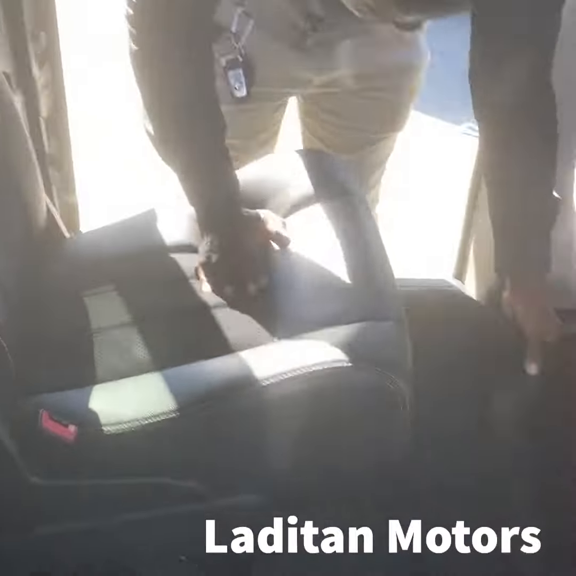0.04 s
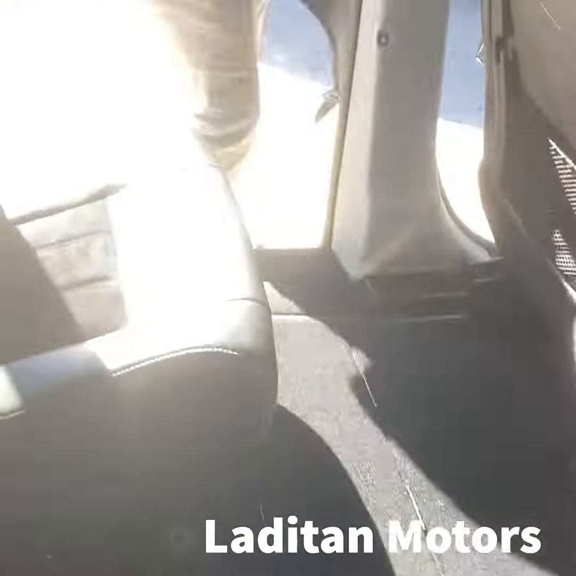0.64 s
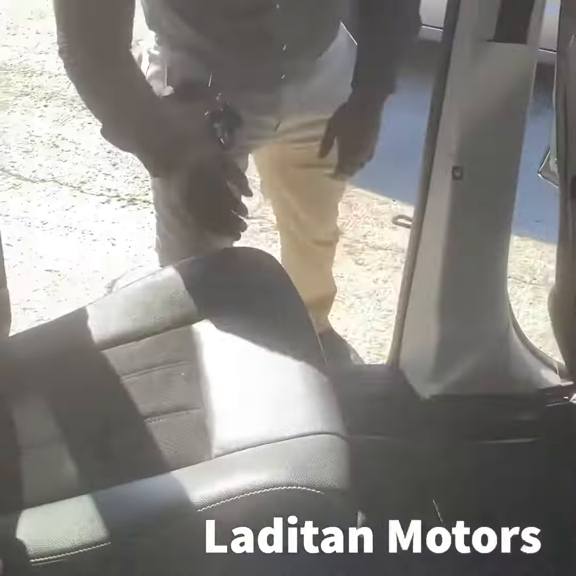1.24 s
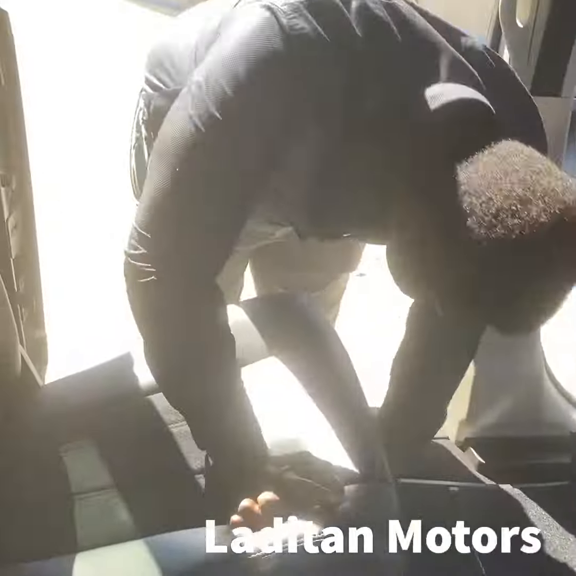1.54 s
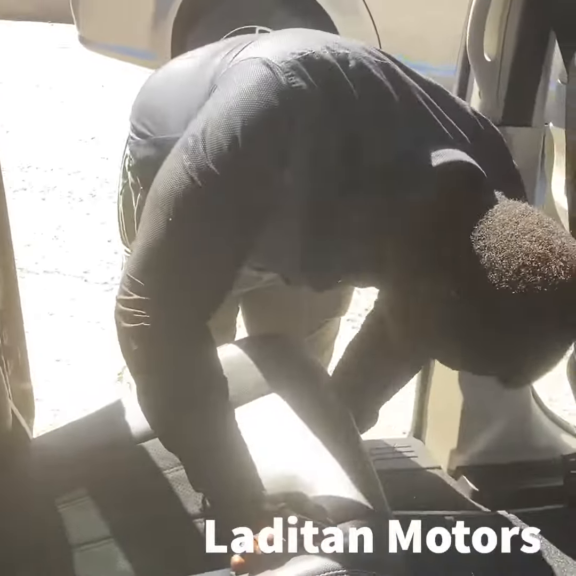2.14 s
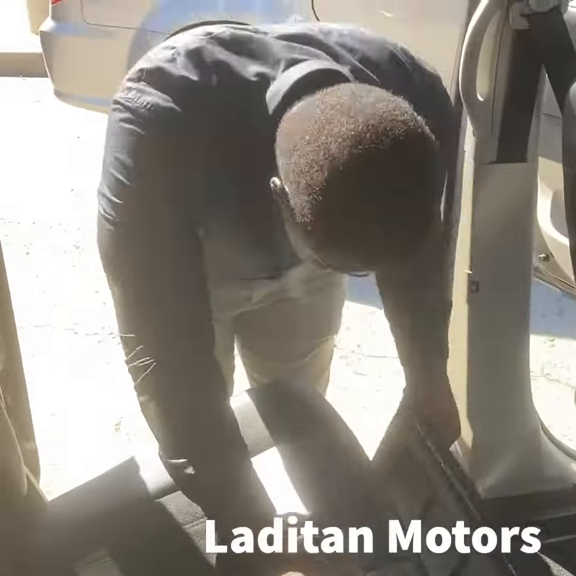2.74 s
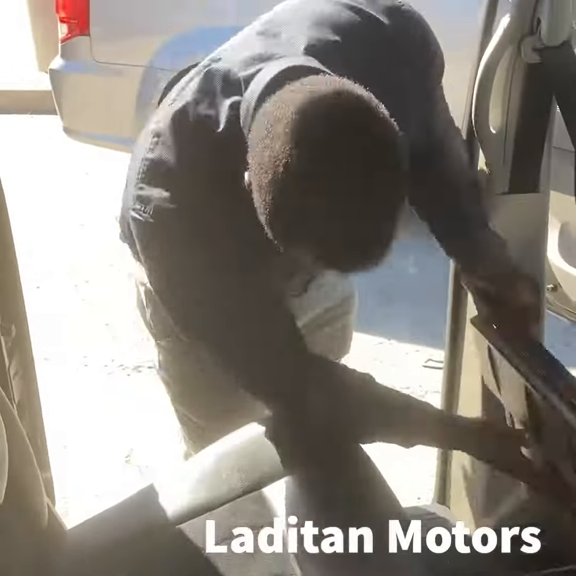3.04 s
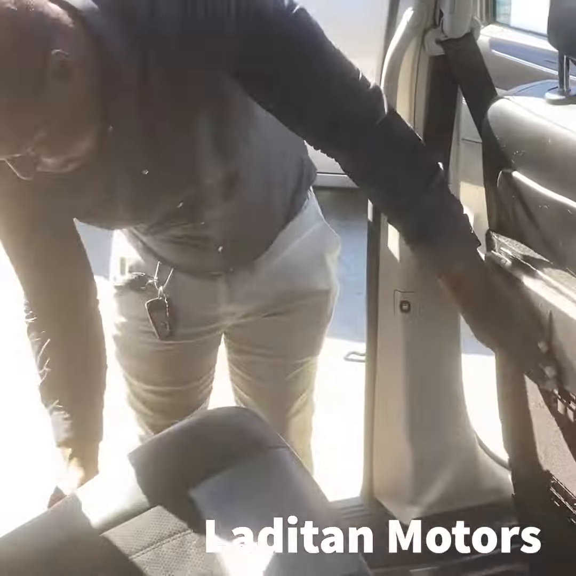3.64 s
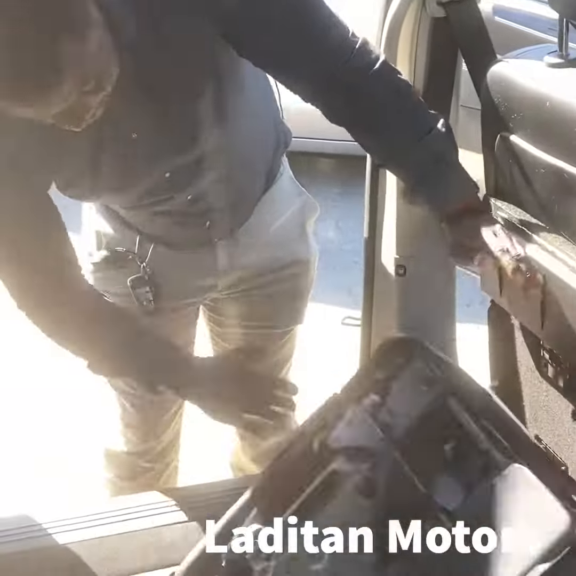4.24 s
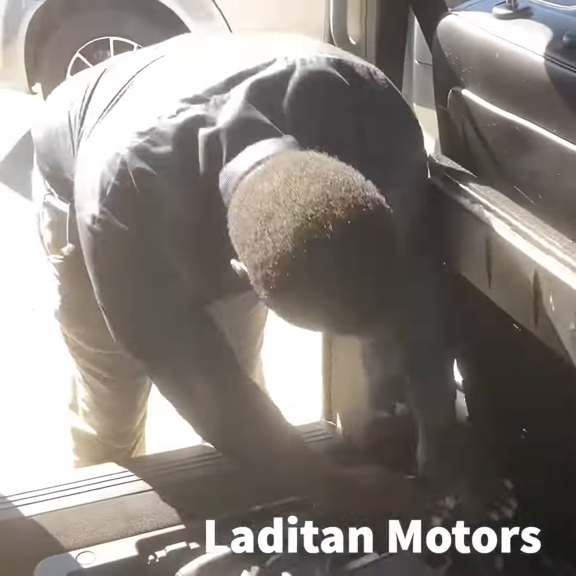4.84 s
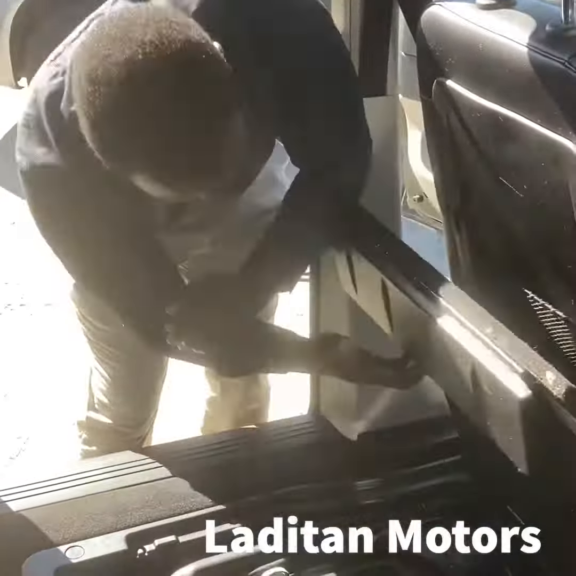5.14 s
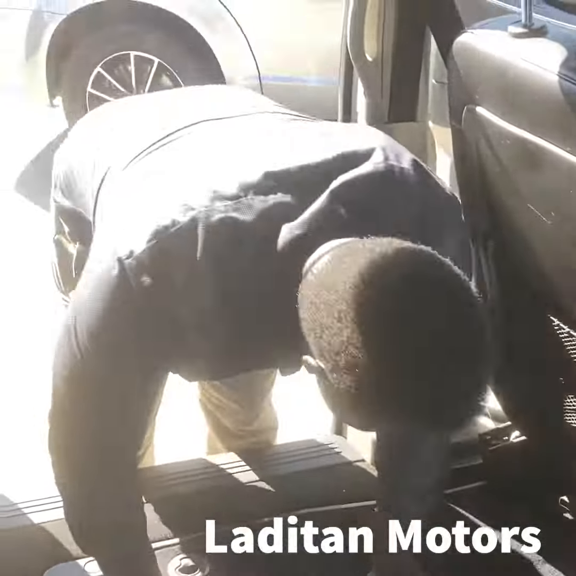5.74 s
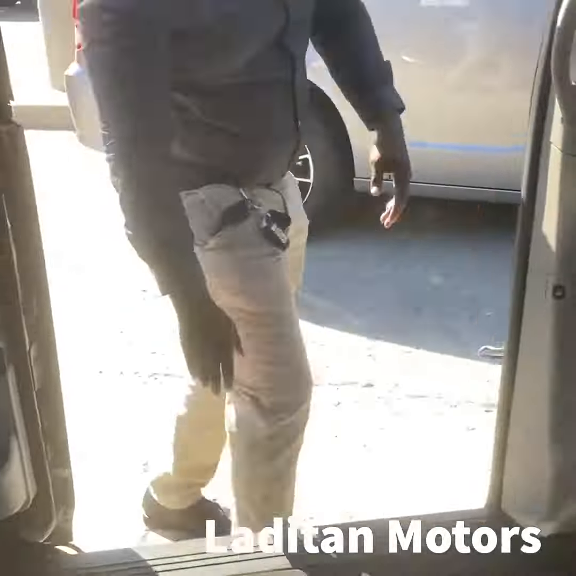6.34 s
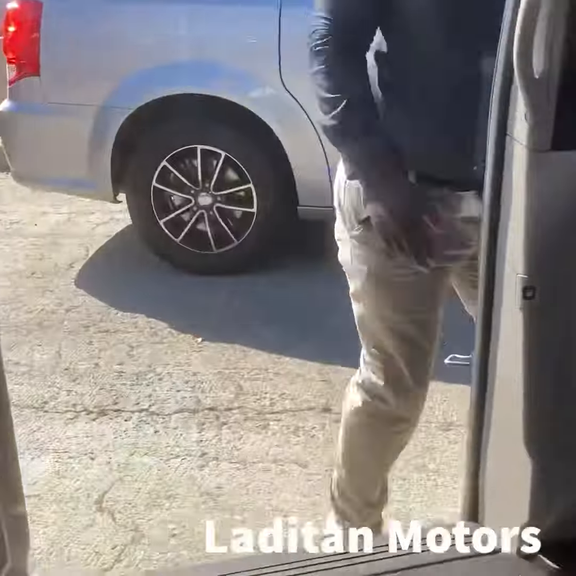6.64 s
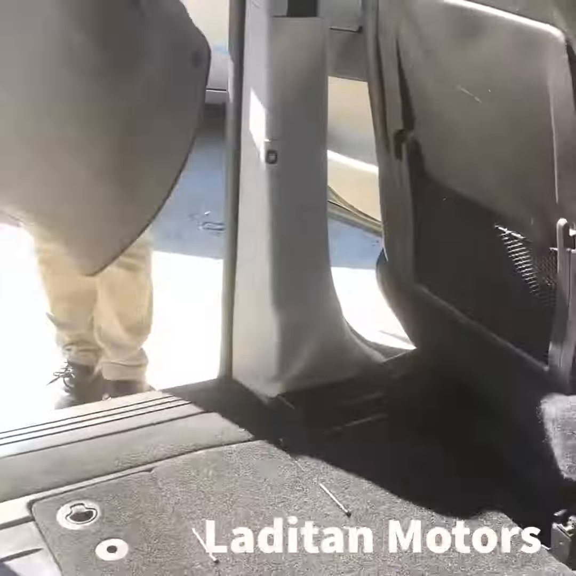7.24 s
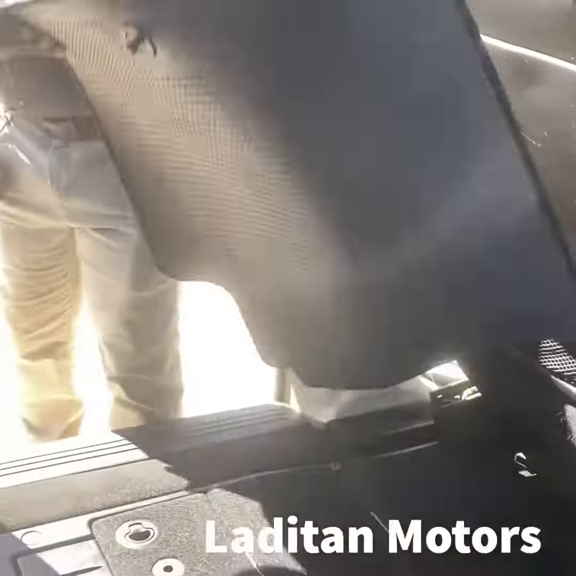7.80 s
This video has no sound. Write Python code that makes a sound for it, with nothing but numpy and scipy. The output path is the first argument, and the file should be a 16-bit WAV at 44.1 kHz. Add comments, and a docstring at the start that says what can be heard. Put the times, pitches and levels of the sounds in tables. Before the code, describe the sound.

Soft rustling and rubbing of sleeves and upholstery lead into a cluster of sharp latch snaps and hollow knocks as a van seat is folded away. It thuds and rattles into the floor, then the lid claps shut and only small clicks and cloth sounds remain. The handling is close and dry in the padded cabin, over idling engines and a faint wash of distant traffic.

```python
"""Inside a van with the side door open: a seat is folded into the floor and the lid above it is shut.
Near the microphone, latches snap, plastic trim clacks and the hollow floor panel thuds as parts meet.
Sleeves and upholstery rustle and rub, their fibres catching and slipping.
Further off, engines hum and boom in the cabin under a faint wash of traffic.
Everything reaches the microphone's two ports only partly alike."""
import sys
import numpy as np
from scipy import signal
from scipy.fft import rfft, irfft, next_fast_len
from scipy.io import wavfile
from scipy.ndimage import uniform_filter1d

SR = 44100
rng = np.random.default_rng(int(sys.argv[2]) if len(sys.argv) > 2 else 0)


def transcribe(u):
    """Save the signal u as a 16-bit wav file named by the first command-line argument.

    u: samples, shape (n,) or (channels, n), limited to [-1, 1]; the rate is SR.
    q: integer samples, one column per channel.
    """
    v = np.clip(np.atleast_2d(u).T, -1, 1)
    q = np.round(v * 32767).astype(np.int16)
    wavfile.write(sys.argv[1], SR, q)


N = 347067
TIME = np.arange(N) / SR

# Far traffic and its boom in the cabin. Each row: time in seconds, relative level in dB.
TRAFFIC_LEVEL = [(1.27, -56.5), (2.12, -54.5), (3.6, -59.5), (3.88, -52.5), (4.82, -52.5), (5.02, -57),
                 (6.95, -53.5), (7.6, -59.5)]
BOOM_LEVEL = [(.65, -40), (1.75, -44), (2.15, -37.5), (3.5, -42.5), (4.4, -35.5), (5.1, -41.5), (6.9, -43),
              (7.87, -38)]
# An engine drops from a fast idle to a slow one. Each row: time in seconds, pitch in Hz.
IDLE_PITCH = [(0, 73.34), (4.25, 79), (4.6, 63.65), (7.87, 61.33)]
# The colour of each source. Each row: frequency in Hz, gain in dB.
TRAFFIC_COLOUR = [(170, 5.5), (350, -0.5), (620, 3), (900, -5.5), (1400, -17.5), (2500, -17.5),
                  (4000, -34.5), (15000, -48)]
RUMBLE_COLOUR = [(15, -17.5), (30, -5), (48, -3), (110, -7.5), (160, -15.5), (1000, -75)]
CLOTH_COLOUR = [(400, -18), (1200, 0), (3800, 2), (9000, 3), (14500, 1.5), (15600, -8.5), (16200, -27)]
PLASTIC_COLOUR = [(560, -22), (1000, 1.5), (2000, 5), (3100, -1), (4500, -16.5), (8000, -53.5)]
TICK_COLOUR = [(1200, -28), (2900, 2.5), (4500, 6), (8000, 2.5), (12500, 1.5), (15000, -4.5), (16500, -24)]
# Modes of the floor panel and its hollow. Each row: pitch in Hz, relative level in dB, t60 in seconds.
PANEL_MODES = [(111.5, -6, 0.086), (132, -5, 0.096), (168.6, 1, 0.066), (203.3, 3, 0.05), (255, -5, 0.052)]
HOLLOW_MODES = [(293, -4, 0.041), (338, -7, 0.08), (405.6, 0, 0.031), (489.6, 1, 0.026), (622, 2.5, 0.028),
                (735, -6, .035)]
# Strokes of sleeves, trousers and carpet; the short stroke at 2.644 s is the latch mechanism sliding as the lid
# shuts. Each row: start in seconds, length in seconds, level in dB.
CLOTH_STROKES = [(0.031, 0.68, -55), (0.833, 0.28, -57), (1.351, 0.2, -49), (2.644, 0.067, -49),
                 (2.807, 0.15, -45), (2.954, 0.27, -54.5), (3.549, 0.15, -62.5), (3.991, 0.52, -53),
                 (4.481, 0.25, -55), (4.667, 0.24, -48), (4.863, 0.21, -52.5), (5.05, 0.17, -52),
                 (5.169, .17, -50.5), (5.4, 0.08, -51), (5.477, 0.052, -37.5), (6.005, 0.067, -51),
                 (6.42, .12, -59), (6.854, 0.22, -52), (7.25, 0.3, -54)]
# Loose trim and buckles click. Each row: start in seconds, level in dB, pitch in Hz.
TRIM_CLICKS = [(1.714, -57, 2400), (2.44, -42, 3040), (2.895, -44, 3380), (2.95, -43, 7150),
               (3.624, -55, 4200), (3.799, -45, 3100), (3.94, -24, 9400), (4.112, -43.5, 3670),
               (4.281, -36, 6450), (4.494, -51.5, 2340), (4.859, -33.5, 13500), (4.965, -49, 7900),
               (5.183, -41.5, 2760), (5.222, -42, 4400), (5.479, -40, 7440), (5.568, -43.5, 2330),
               (6.486, -52.5, 9000), (6.981, -50.5, 3200), (7.103, -54.5, 2400), (7.609, -56.5, 2420)]
# Seat and panels slide on trim. Each row: start and length in seconds, level in dB, centre in Hz.
TRIM_RUBS = [(0.237, 0.049, -52, 1660), (0.474, 0.059, -55, 1680), (1.759, 0.85, -64.5, 2420),
             (1.88, 0.74, -52, 686), (2.911, .15, -40.5, 2050), (2.912, 0.17, -43.5, 790),
             (3.28, .12, -60.5, 2300), (4.275, 0.16, -47, 2300), (4.277, 0.15, -53.5, 895),
             (4.685, 0.58, -57.5, 1720), (4.801, 0.24, -37.5, 189), (6.872, .42, -63, 1810)]
# Latches catch and the lid claps shut. Each row: start in seconds, clack level in dB, clack pitch in Hz,
# tick level in dB, hollow knock level in dB, knock pitch in Hz, panel thud level in dB.
LATCH_BLOWS = [(0.354, -41.5, 2620, -61, -42, 537, -42), (2.6423, -25, 2900, -25.5, -39.5, 400, -40),
               (2.694, -16, 1660, -28.5, -28, 334, -30), (3.132, -28.5, 2010, -28, -42, 781, -50),
               (3.197, -36.5, 1110, -34.5, -29, 572, -36), (3.2096, -17, 1203, -32, -23, 568, -30.5),
               (3.27, -18, 1230, -27, -17, 610, -43), (5.5165, -27.5, 2720, -21, -27, 324.4, -24.5),
               (5.6129, -22, 1173, -23.5, -24.5, 480, -26)]
# The padded seat meets the floor. Each row: start in seconds, thud level in dB,
# hollow knock level in dB, knock pitch in Hz, rattle level in dB.
SEAT_BUMPS = [(0.439, -43, -44.5, 304, -66), (.939, -39, -42, 423, -58.5), (.988, -34, -33.5, 310, -61),
              (2.814, -37, -33.5, 610, -46), (3.849, -20.5, -25.5, 403, -32.5),
              (3.922, -21.5, -33, 475, -21.5), (3.953, -23.5, -31, 530, -31.5),
              (4.187, -26, -39.5, 650, -25), (4.855, -30, -46, 620, -28.5),
              (4.926, -27.5, -38.5, 480, -38.5), (7.272, -43, -41, 577, -75)]
# Hollow trim is tapped or scuffed. Each row: start in seconds, level in dB, pitch in Hz.
TRIM_TAPS = [(4.525, -47.5, 1700), (4.562, -44.5, 1390), (4.863, -36, 1150), (4.996, -40.5, 1280),
             (6.962, -52.5, 1400), (7.047, -58, 2300), (7.162, -55.5, 1310), (7.416, -50, 1760)]
# Phase between the microphone ports. Each row: frequency in Hz, lead of the left in radians.
MIC_PHASE = [(270, 0), (650, -1.9), (900, -2.2), (1200, -.9), (2000, -1.6), (3800, -4.6), (5500, -3.1),
             (7800, 0), (9100, 0), (11700, 3.1), (13900, 6.28)]
# How alike the ports sound. Each row: frequency in Hz, likeness from 0 to 1.
MIC_LIKENESS = [(200, 0.92), (700, 0.63), (3500, 0.23), (5500, 1)]
# Balance of the ports. Each row: frequency in Hz, left minus right in dB.
MIC_BALANCE = [(70, -3.5), (450, -3.5), (1100, -0.5), (1900, -0.14)]


def amp(db):
    return 10 ** (np.asarray(db) / 20)


def unit_rms(x):
    return x / np.sqrt(np.mean(x ** 2) + 1e-20)


def at_level(x, db, span_s=0.02):
    """Scales a blow to the rms level it would have with all its energy in span_s."""
    return amp(db) * x / np.sqrt((x ** 2).mean(0).sum() / (span_s * SR) + 1e-20)


def over_frequency(points, hz):
    knots_hz, values = np.transpose(points)
    return np.interp(np.log(hz + 1), np.log(knots_hz), values)


def over_time(points):
    return np.interp(TIME, *np.transpose(points))


def add(mix, start, sound):
    part = mix[:, max(0, round(start * SR)):][:, :sound.shape[1]]
    part += sound[:, :part.shape[1]]


def colour(x, points, size=8192):
    """Causal filter with the given spectrum."""
    log_gain = np.log(amp(over_frequency(points, abs(np.fft.fftfreq(size, 1 / SR)))))
    taps = np.fft.ifft(np.exp(np.conj(signal.hilbert(log_gain)))).real[:size // 2]
    return signal.oaconvolve(x, taps[None], axes=1)[:, :x.shape[1]]


def resonate(x, hz, width_hz):
    """A resonance of gain 1 whose pitch may follow a curve."""
    turn = np.exp(2j * np.pi * np.cumsum(hz * np.ones(x.shape[1])) / SR)
    pole = np.exp(-np.pi * width_hz / SR)
    return 2 * (turn * signal.lfilter([1 - pole], [1, -pole], x / turn + 1e-18)).real


def drift(size, per_s):
    """Glides between random values of unit spread."""
    knots = rng.standard_normal(int(size / SR * per_s) + 2)
    return np.interp(np.arange(size) / SR * per_s, np.arange(len(knots)), knots)


def at_mic(x):
    """Two unrelated signals become the partly alike sound at the two microphone ports."""
    size = next_fast_len(x.shape[1])
    hz = np.fft.rfftfreq(size, 1 / SR)
    left, unrelated = rfft(x, size)
    likeness = np.clip(over_frequency(MIC_LIKENESS, hz), 0, 1)
    lag = np.exp(-1j * over_frequency(MIC_PHASE, hz))
    right = (likeness * left + np.sqrt(1 - likeness ** 2) * unrelated) * lag
    return irfft(np.array([left, right]), size)[:, :x.shape[1]]


def traffic(wash_db=7, boom_db=-5, hum_db=-5, rumble_db=-4, boom_width_hz=26, swell_db=3):
    """A wash of far traffic; its engines hum, rumble and boom in a narrow cabin resonance."""
    far, low, air = (at_mic(noise) for noise in rng.standard_normal((3, 2, N)))
    wash_gain = amp(over_time(TRAFFIC_LEVEL) + wash_db + swell_db * drift(N, 12))
    wash = wash_gain * unit_rms(colour(far, TRAFFIC_COLOUR))
    idle_hz = over_time(IDLE_PITCH)
    boom = resonate(resonate(air, idle_hz, boom_width_hz), idle_hz, boom_width_hz)
    hum = np.sin(2 * np.pi * np.cumsum(idle_hz + 2 * drift(N, 8.2)) / SR)
    rumble = colour(low, RUMBLE_COLOUR)
    engines = amp(boom_db) * unit_rms(boom) + amp(hum_db) * unit_rms(hum)
    engines = engines + amp(rumble_db) * unit_rms(rumble)
    return wash + amp(over_time(BOOM_LEVEL)) * engines


def fibres(size, catches_per_s=150, crackle_s=0.0005):
    """Cloth drags unevenly, fibres catch in clumps, creases crackle; each fold has its own colour."""
    drag = amp(2.4 * drift(size, 30) + 2.2 * drift(size, 140) + 2.2 * drift(size, 1200))
    catches = (rng.random(size) < catches_per_s / SR) * np.minimum(rng.exponential(1.9, size), 6)
    crackle = signal.lfilter([1], [1, -np.exp(-1 / (crackle_s * SR))], catches)
    friction = rng.standard_normal((2, size)) * (drag + crackle)
    spectra = signal.stft(friction, nperseg=256)[2]
    folds = uniform_filter1d(rng.standard_normal(spectra.shape[1:]), 7, axis=0)
    folds = uniform_filter1d(folds, 4, axis=1)
    cloth = signal.istft(spectra * amp(3.5 * unit_rms(folds)))[1][:, :size]
    return unit_rms(colour(at_mic(cloth), CLOTH_COLOUR))


def rustle(db=-69, unrest_db=3):
    """Clothes near the microphone never quite keep still."""
    return fibres(N) * amp(db + unrest_db * drift(N, 6.3))


def swish(start, length, db, skew=0.58, clicks_per_s=14):
    """One stroke of cloth, quick to speed up and slower to stop, jostles loose trim on the way."""
    size = int(max(length, .03) * SR)
    speed = abs(np.sin(np.pi * np.linspace(0, 1, size) ** skew))
    stroke = amp(db) * speed * fibres(size)
    for place, strength, pitch in rng.random((round(length * clicks_per_s), 3)):
        add(stroke, *click(length * (.1 + .7 * place), db - 12 + 6 * strength, hz=1300 * 3 ** pitch))
    return start, stroke


EVEN_HZ = 2400  # small parts tick, large ones clack; at this pitch both are equal


def snap(t, contact_s, clack_db, clack_hz, tick_db, release_s=0.003, chatter_s=0.0085):
    """Parts scrape together and chatter briefly as they seat; a short contact starts abruptly."""
    scrape = amp(-11) * np.exp(-abs(t) / (0.87 * contact_s))
    since_contact = np.maximum(t - contact_s, 0)
    seating = np.exp(-since_contact / release_s) + amp(-26) * np.exp(-since_contact / chatter_s)
    force = np.where(t < 0, scrape, seating)
    grit = rng.standard_normal((2, len(t))) * force * amp(3.5 * drift(len(t), 1504))
    touching = np.minimum(force / force.max() * 20, 1) ** .5  # quiet until the parts meet
    grit = at_mic(grit) * touching
    size_shift = (clack_hz / EVEN_HZ) ** 0.2  # larger parts are darker
    plastic = colour(grit, [(hz * size_shift, db) for hz, db in PLASTIC_COLOUR])
    clack = plastic + amp(11) * resonate(plastic, clack_hz, width_hz=340)
    tick = colour(grit, TICK_COLOUR)
    part_modes_hz = [clack_hz, *rng.uniform(2910, 14500, 5)]  # every small part has its own
    tick = tick + amp(5) * sum(resonate(tick, hz, width_hz=400) for hz in part_modes_hz)
    return at_level(clack, clack_db) + at_level(tick, tick_db)


def click(start, db, hz, contact_s=0.0068, tilt_db_per_octave=8.5):
    """A snap too light to move the panel; the higher its pitch, the more tick and the less clack."""
    t = np.arange(-.01, .06, 1 / SR)
    tilt_db = tilt_db_per_octave * np.log2(hz / EVEN_HZ)
    return start + t[0], snap(t, contact_s, db - max(tilt_db, 0), hz, db + min(tilt_db, 0))


def rub(start, length, db, hz, rise_s=0.0072, fade_share=0.29, wander=0.059, top_hz=2780):
    """Fine slips, stalling and hurrying, excite a resonance that shifts as the contact moves."""
    t = np.arange(int(length * SR)) / SR
    slips = at_mic(rng.standard_normal((2, len(t))))
    band = slips * amp(2.5 * drift(len(t), 400) + 1.5 * drift(len(t), 50))
    centre_hz = hz * (1 + wander * drift(len(t), 20))
    for _ in range(4):
        band = resonate(band, centre_hz, width_hz=1600 * np.sqrt(hz / top_hz))
    # the rub sounds dull, with almost nothing above top_hz
    band = signal.sosfilt(signal.butter(10, top_hz, fs=SR, output="sos"), band)
    envelope = np.clip(np.minimum(t / rise_s, (length - t) / (fade_share * length)), 0, 1)
    return start, amp(db) * unit_rms(band) * envelope


def ring(modes, t, scatter):
    """Damped modes; every blow lands elsewhere and weighs them differently."""
    age, ringing = np.maximum(t, 0), 0
    for hz, db, t60 in modes:
        detune, weight = rng.uniform(-1.1, 1, (2, 2, 1))
        envelope = np.sign(weight) * amp(db + 2.7 * abs(weight) - 60 * age / t60)
        ringing = ringing + envelope * np.sin(2 * np.pi * hz * (1 + scatter * detune) * age)
    return ringing


def knock(start, contact_s, thud_db, hollow_db, hollow_hz, clack_db, clack_hz, tick_db):
    """A snap with weight behind it also sets the floor panel and its hollow ringing."""
    t = np.arange(-.02, .15, 1 / SR)
    push = np.clip(t / contact_s, 0, 1)  # heavy parts take the whole contact to get going
    # the place of the blow favours modes near hollow_hz; the rest fall by 17.5 dB an octave
    favoured = [(hz, db - 17.5 * abs(np.log2(hz / hollow_hz)), t60) for hz, db, t60 in HOLLOW_MODES]
    thud = at_level(at_mic(push * ring(PANEL_MODES, t, scatter=0.11)), thud_db)
    hollow = at_level(at_mic(push * ring(favoured, t, scatter=0.04)), hollow_db)
    return start + t[0], thud + hollow + snap(t, contact_s, clack_db, clack_hz, tick_db)


def latch(start, clack_db, clack_hz, tick_db, hollow_db, hollow_hz, thud_db, contact_s=0.0021):
    """Hard parts meet in a brief contact."""
    return knock(start, contact_s, thud_db, hollow_db, hollow_hz, clack_db, clack_hz, tick_db)


def bump(start, thud_db, hollow_db, hollow_hz, rattle_db, contact_s=0.008, fittings_hz=3740):
    """The seat lands softly: its weight sets the floor ringing and its fittings rattle on the trim."""
    clack_db = -35 + 0.66 * (rattle_db + 32)  # the clack grows more slowly than the rattle
    return knock(start, contact_s, thud_db, hollow_db, hollow_hz, clack_db, fittings_hz, rattle_db)


def tap(start, db, hz, fade_s=0.0064, width_hz=520, tick_db=-9):
    """A brief scuff sets a hollow piece of trim ringing, with a faint tick on top."""
    t = np.arange(SR // 20) / SR
    grit = at_mic(rng.standard_normal((2, len(t))) * np.exp(-t / fade_s))
    ringing = resonate(resonate(grit, hz, width_hz), hz, width_hz)
    return start, at_level(ringing, db) + at_level(colour(grit, TICK_COLOUR), db + tick_db)


def cabin(x, t60=0.049, wet_db=-23, dull_hz=2600):
    """The upholstered cabin around the microphone gives a short, dull tail."""
    t = np.arange(SR // 4) / SR
    tail = rng.standard_normal((2, len(t))) * amp(-60 * t / t60) * (t > .004)
    tail = signal.lfilter(*signal.butter(1, dull_hz, fs=SR), tail)
    return x + amp(wet_db) * signal.oaconvolve(x, tail / np.linalg.norm(tail[0]), axes=1)[:, :N]


def scene():
    """Close handling sounds in the cabin, over the distant noise from outside."""
    handling = np.zeros((2, N))
    for source, table in ((latch, LATCH_BLOWS), (bump, SEAT_BUMPS), (click, TRIM_CLICKS),
                          (tap, TRIM_TAPS), (swish, CLOTH_STROKES), (rub, TRIM_RUBS)):
        for row in table:
            add(handling, *source(*row))
    return cabin(handling) + rustle() + traffic()


def record(dry, top_hz=16400):
    """The microphone's right port hears the lows louder; peaks are rounded off and the top is cut."""
    balance_db = over_frequency(MIC_BALANCE, np.fft.rfftfreq(N, 1 / SR))
    tilted = irfft(rfft(dry) * amp(np.array([balance_db, -balance_db]) / 2), N)
    band_limit = signal.firwin(255, top_hz, window=("kaiser", 9), fs=SR)
    return signal.oaconvolve(np.tanh(tilted), band_limit[None], "same")


dry = scene()
out = record(dry)
transcribe(out)
```